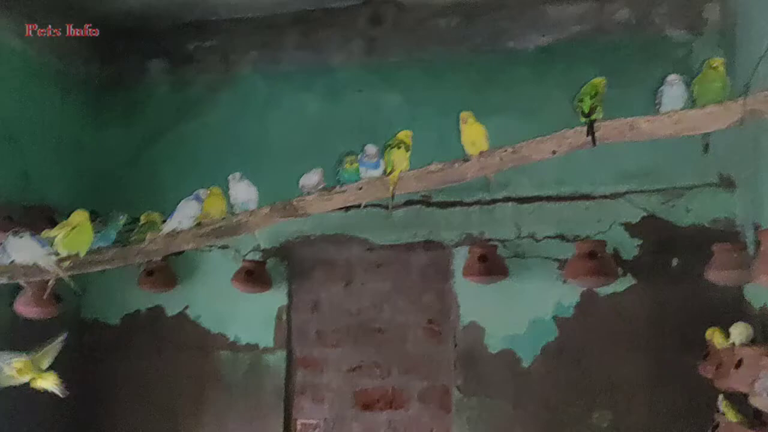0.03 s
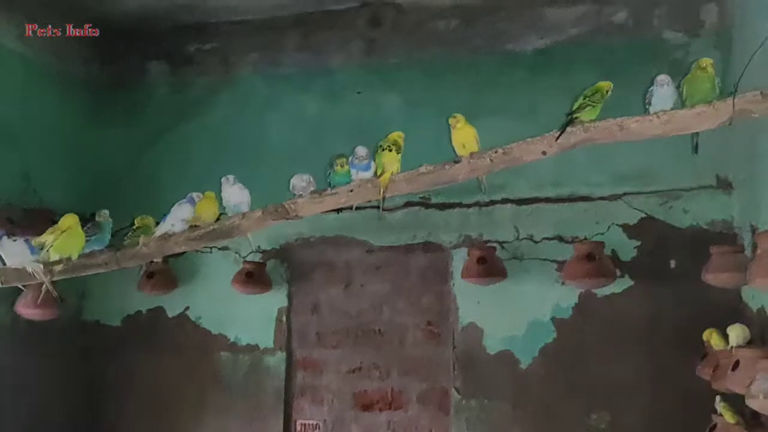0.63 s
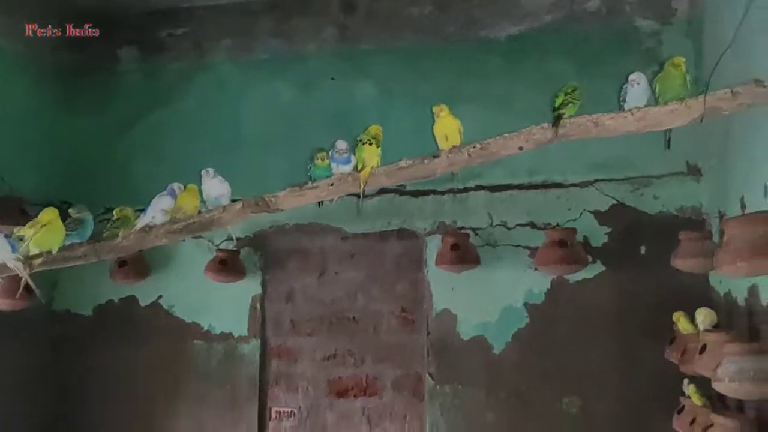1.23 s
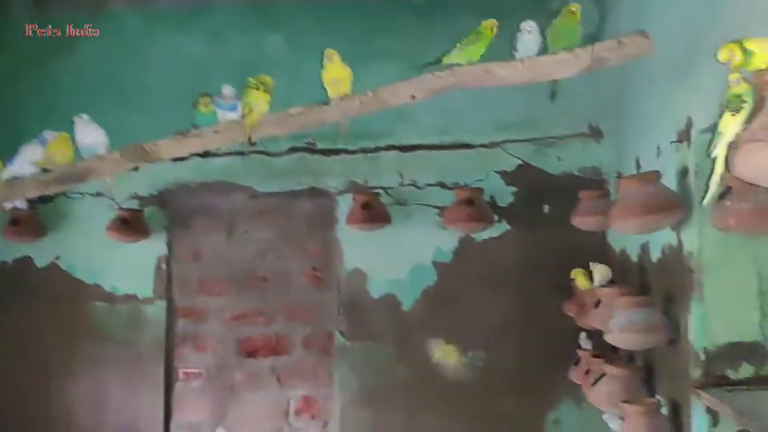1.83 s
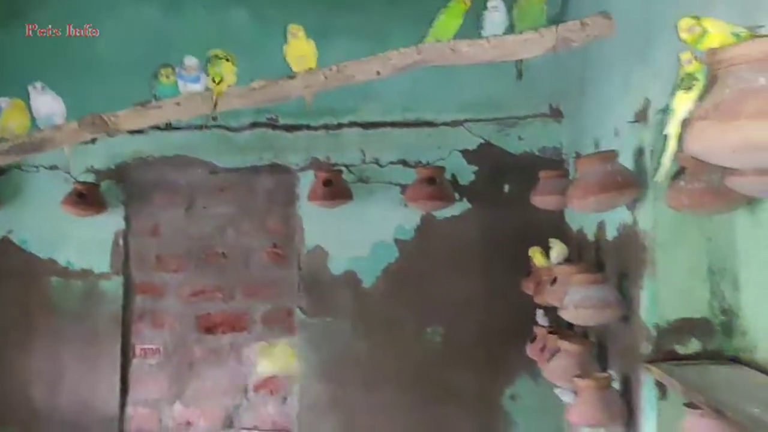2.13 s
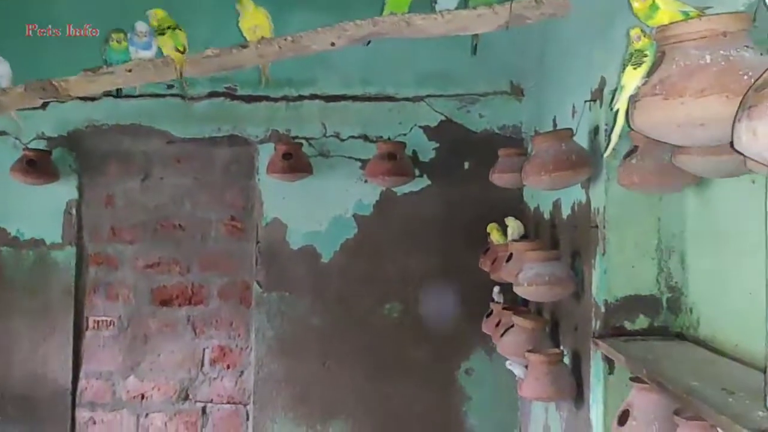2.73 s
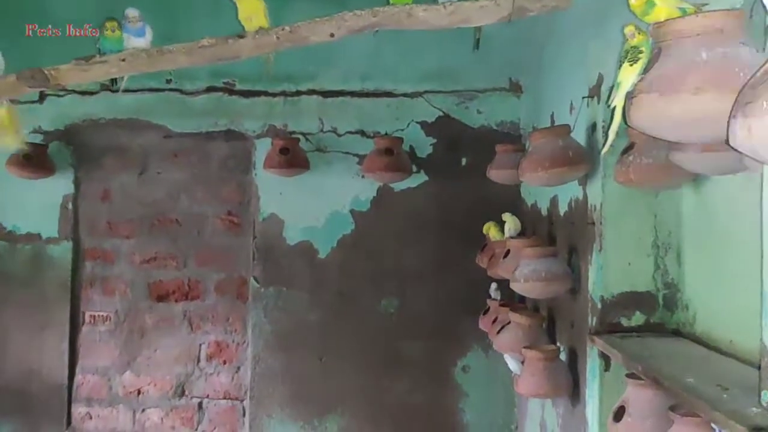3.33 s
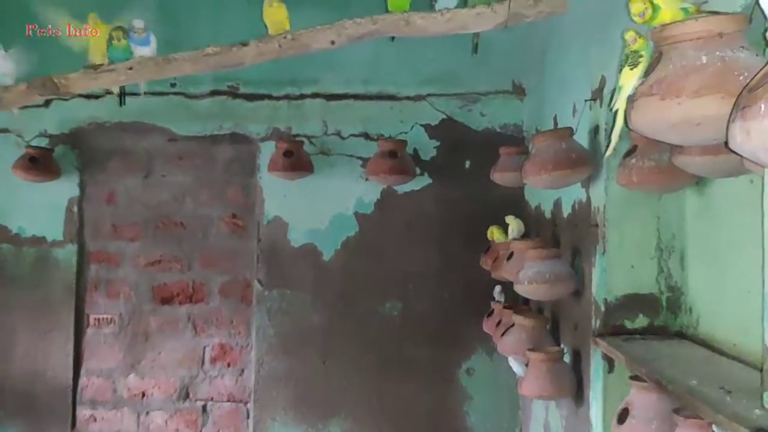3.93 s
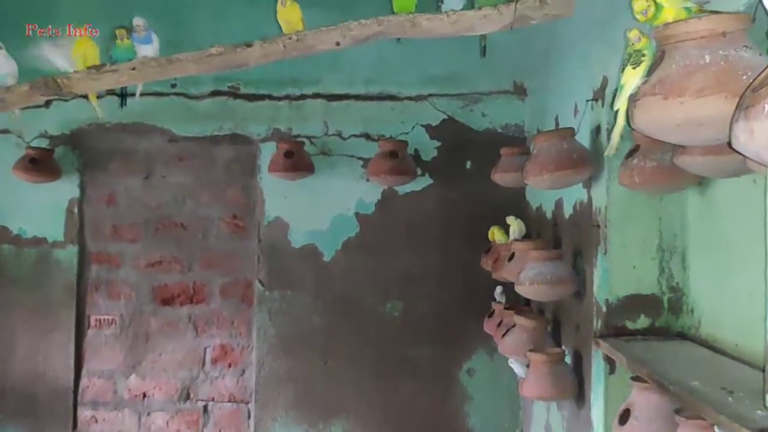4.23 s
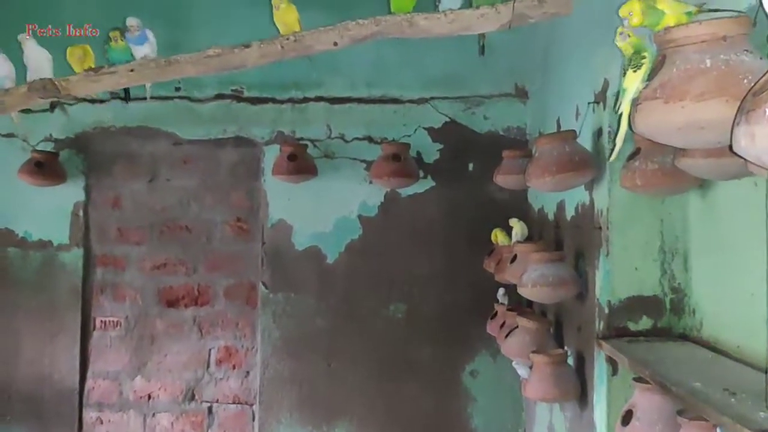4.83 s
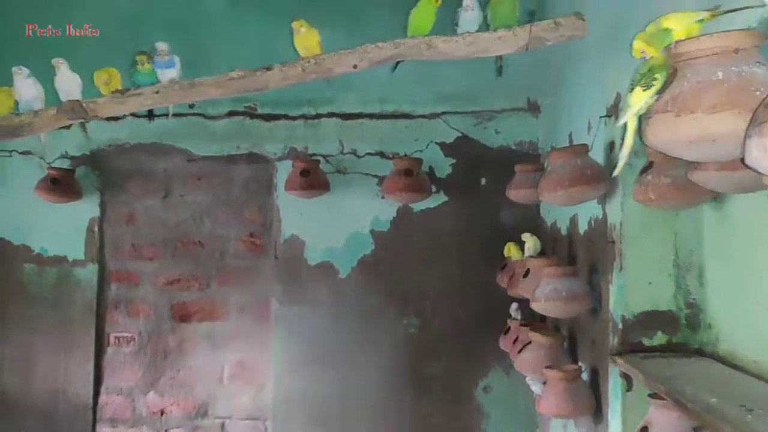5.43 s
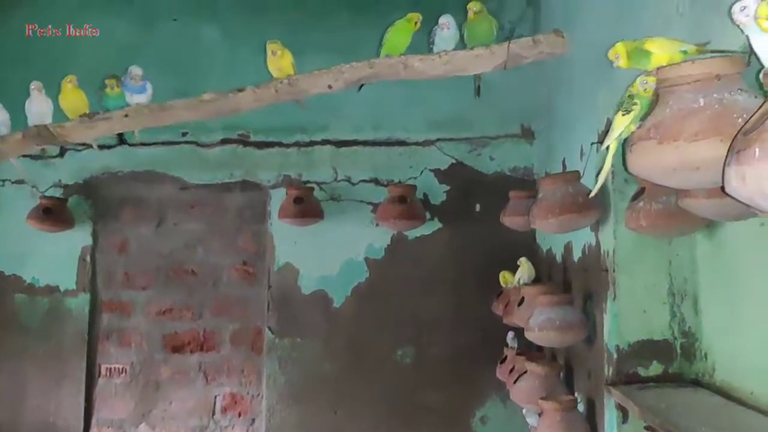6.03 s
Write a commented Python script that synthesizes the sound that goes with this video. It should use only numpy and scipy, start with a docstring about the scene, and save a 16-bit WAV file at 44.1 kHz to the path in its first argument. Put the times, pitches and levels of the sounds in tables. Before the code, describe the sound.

Small parrots call over one another indoors, their bright chirps, thin whistles and scratchy squawks standing out from a more distant twittering. A few soft wingbeats pass in the first half, then the chatter grows raspier and busier. The hard walls give every call a short echo, and the flock sits slightly left of the microphone. A quiet hum, rumble and airy hiss lie underneath.

```python
"""Budgerigars chatter in a bare brick room: warbled chirps, peeps, whistles, quick sweeps, raspy squawks.
Each call is a membrane tone from the syrinx, bent in pitch; in a squawk the membranes slap and ring
the beak. The hard walls draw every call out into a tail. Birds further off keep up a soft babble and
some flutter between perches. Underneath lie a low hum, rumble, moving air and a few faint tones."""
import sys
import numpy as np
from scipy import signal
from scipy.fft import rfft, irfft, next_fast_len
from scipy.io import wavfile
from scipy.ndimage import uniform_filter1d, minimum_filter1d

SR = 44100
rng = np.random.default_rng(int(sys.argv[2]) if len(sys.argv) > 2 else 0)


def to_wav(sig):
    """Store sig (one row per channel, or 1-D mono) as 16-bit WAV at the path in sys.argv[1].

    Samples outside -1..1 are clipped; the rate is SR.
    """
    pcm = np.clip(np.atleast_2d(sig), -1, 1) * 32767
    pcm = np.round(pcm).astype(np.int16)
    wavfile.write(sys.argv[1], SR, pcm.T)  # frames by channels


N = 268039
TIME = np.arange(N) / SR
CALL_T = np.arange(SR * 2 // 9) / SR  # time axis of one call, s
TOP_HZ = 15900


def near_birds():
    """The clear calls, each from its own perch."""
    # Each row: start in s, length in s, pitch in Hz, level in dB.
    chirps = [(0.384, 0.098, 3410, -20), (0.602, 0.052, 2980, -30.5), (0.647, .08, 3622, -18),
              (.698, 0.075, 3270, -29.5), (0.904, 0.086, 2912, -22.5), (1.042, 0.071, 3150, -26),
              (1.303, 0.077, 3370, -33.5), (1.369, 0.075, 3330, -29.5), (1.515, 0.068, 3820, -30.5),
              (1.587, 0.049, 3206, -21), (1.926, 0.13, 3042, -20.5), (2.059, 0.094, 3640, -18),
              (2.496, 0.11, 2883, -25), (2.544, 0.08, 3638, -24), (2.615, 0.073, 2103, -34),
              (2.936, 0.058, 2943, -28), (3.119, .12, 3165, -17.5), (3.377, 0.11, 3212, -22),
              (3.531, 0.1, 3350, -29.5), (3.819, 0.024, 3757, -22), (3.868, 0.1, 3108, -21),
              (4.219, .13, 2995, -25), (4.402, 0.039, 4337, -17.5), (4.804, 0.0656, 3400, -18.5),
              (4.859, 0.102, 3500, -19.5), (5.04, 0.06, 3400, -22.5), (5.326, 0.12, 2880, -33),
              (5.458, 0.087, 3466, -20.5), (5.537, .17, 2700, -33), (5.582, 0.057, 3580, -16.5),
              (5.69, 0.086, 3435, -37), (5.979, 0.096, 3014, -15.5)]
    # Each row: start in s, pitch in Hz, level in dB.
    peeps = [(1.65, 2828, -23.5), (2.49, 3410, -21.5), (3.075, 3565, -29), (3.19, 3530, -21),
             (3.41, 3584, -22), (4.885, 3494, -15), (5.068, 3040, -27), (5.285, 3887, -23),
             (5.874, 3326, -12.5)]
    # Each row: start in s, length in s, pitch in Hz, level before the beak in dB.
    whistles = [(0.385, 0.0063, 3066, -14), (0.827, 0.034, 4620, -25), (0.861, 0.031, 4780, -14.5),
                (.911, 0.026, 3100, -24), (0.979, 0.053, 2802, -19.5), (1.056, 0.022, 2964, -17),
                (1.725, 0.024, 3134, -13), (2.33, 0.041, 3073, -21), (2.389, 0.026, 3315, -20.5),
                (2.474, 0.14, 3050, -19), (2.656, 0.083, 3014, -19.5), (2.825, 0.061, 3096, -24),
                (3.387, 0.17, 2940, -28), (3.568, 0.024, 2970, -15.5), (3.993, 0.14, 2865, -27),
                (4.701, 0.16, 2960, -33), (5.306, 0.058, 3380, -25), (5.557, 0.023, 3787, -13.5),
                (5.562, 0.047, 2937, -13.5), (5.856, 0.043, 3042, -15.5), (5.922, 0.047, 4328, -13.5),
                (5.94, .03, 3333, -10.5)]
    # Each row: frequency in Hz, gain of the open beak in dB.
    beak_response = [(2800, -11), (3300, -18), (3900, 1), (6400, -8.5), (7700, -8.5), (9400, -13)]
    # Each row: start in s, start pitch in Hz, end pitch in Hz, level in dB.
    sweeps = [(0.402, 8600, 7760, -30.5), (0.433, 7300, 9300, -38), (.455, 8400, 7150, -36),
              (.963, 9600, 8800, -17.5), (1.267, 4360, 5520, -29.5), (1.558, 9200, 8540, -35.5),
              (1.604, 7500, 6960, -31), (1.633, 8800, 8240, -32), (1.655, 5500, 6160, -30),
              (4.109, 4580, 6240, -18), (4.11, 6940, 9070, -14), (4.136, 4376, 6280, -14),
              (4.224, 9870, 7950, -18), (4.269, 8800, 5600, -17), (4.313, 5200, 7030, -16.5),
              (4.372, 6200, 7600, -19), (4.715, 8800, 6850, -16.5), (5.915, 7670, 9000, -30)]
    # Each row: start in s, length in s, pitch in Hz, beak resonance in Hz, roughness 0-1, relative dB.
    squawks = [(0.818, 0.12, 2418, 9000, .35, -27.5), (.925, 0.057, 2900, 7000, .7, -20.5),
               (1.264, 0.033, 3420, 6600, 0.5, -36), (1.715, 0.039, 3190, 6040, .6, -29),
               (1.807, 0.05, 2784, 6340, .9, -21), (1.899, 0.054, 2790, 5000, 1, -17.5),
               (2.009, 0.042, 3130, 6300, 0.5, -29), (2.443, 0.14, 2075, 4000, .6, -31),
               (2.631, 0.086, 2152, 4170, .8, -28.5), (3.52, 0.037, 2830, 5500, .6, -33.5),
               (4.103, 0.069, 2600, 5300, .8, -18.5), (4.208, 0.086, 3038, 5400, .9, -22),
               (4.305, 0.062, 2604, 4480, 1, -19.5), (4.432, 0.045, 2250, 4740, .8, -26),
               (4.538, 0.069, 2698, 5600, 1, -28), (4.665, 0.071, 2950, 5870, .9, -23),
               (4.776, 0.024, 3550, 7000, 1, -24.5), (4.874, 0.06, 2600, 5500, 1, -35.5),
               (5.323, 0.06, 3350, 6600, .7, -26), (5.519, 0.044, 2903, 3650, .9, -24),
               (5.592, 0.037, 2980, 4800, .8, -26), (5.853, 0.029, 3160, 12600, .3, -27.5),
               (5.931, 0.025, 3305, 5930, .5, -17.5)]
    out = np.zeros((2, N))
    for start_s, length_s, hz, db in chirps:
        add(out, start_s, amp(db) * room(chirp(length_s, *glide(hz)), direct_db=0))
    for start_s, hz, db in peeps:
        add(out, start_s, amp(db) * room(peep(hz), direct_db=-4.5))
    for start_s, length_s, hz, db in whistles:
        call = whistle(length_s, *glide(hz), along(beak_response, hz), along(beak_response, 2 * hz))
        add(out, start_s, amp(db) * room(call, direct_db=-4.5))
    for start_s, start_hz, end_hz, db in sweeps:
        add(out, start_s, amp(db) * room(sweep(start_hz, end_hz), direct_db=-0.5))
    for start_s, length_s, hz, beak_hz, roughness, db in squawks:
        call = squawk(length_s, beak_hz, hz, lurch=0.09 * roughness)
        add(out, start_s, amp(db) * room(call, direct_db=-1))
    return out


def syrinx(length_s, start_hz, end_hz, bend):
    """Phase of a gliding membrane tone; bend is a fraction of its pitch."""
    pitch_hz = start_hz + (end_hz - start_hz) * np.clip(CALL_T / length_s, 0, 1)
    return 2 * np.pi * np.cumsum(pitch_hz * (1 + bend)) / SR


def glide(hz, rise=0.018, spread=0.0299):
    """Start and end pitch of a call drifting, mostly upward, through hz."""
    half = (rise + spread * rng.standard_normal()) / 2
    return hz * (1 - half), hz * (1 + half)


def chirp(length_s, start_hz, end_hz, crest=0.045, dip=0.16, trill_hz=90):
    """A warble: pitch dwells on a crest and dives unevenly; the level sags in each dive."""
    rate_hz = trill_hz * (1 + 0.4 * wobble(90, CALL_T))
    trill = np.sin(np.pi * np.cumsum(rate_hz) / SR) ** 2
    dive = dip * trill ** 2 * (1 + 0.79 * np.tanh(wobble(200, CALL_T)))
    wander = 0.0368 * np.tanh(wobble(68.87, CALL_T))
    jitter = 0.021 * wobble(2500, CALL_T)
    phase = syrinx(length_s, start_hz, end_hz, crest - dive + wander + jitter)
    tone = np.sin(phase) + amp(-23) * np.sin(2 * phase) + amp(-30) * np.sin(3 * phase)
    flutter_db = 3.9 * wobble(154.6, CALL_T) - 2 * trill
    return unit(tone * amp(flutter_db)) * swell(length_s, edge_s=0.024)


def peep(hz, length_s=0.044):
    """A nearly pure, level note."""
    phase = syrinx(length_s, hz, hz, 0.013 * wobble(328, CALL_T))
    return unit(np.sin(phase)) * swell(length_s, edge_s=0.0028)


def whistle(length_s, start_hz, end_hz, first_db, octave_db, flutter_db=4):
    """A held note that arches and wavers; the beak favours the octave, and each partial flutters."""
    arch = 0.021 * (np.sin(np.pi * np.clip(CALL_T / length_s, 0, 1)) - 2 / np.pi)
    phase = syrinx(length_s, start_hz, end_hz, arch + 0.025 * wobble(896, CALL_T))
    tone = 0
    for k, db in enumerate([first_db, octave_db, octave_db - 10, octave_db - 17], start=1):
        flutter = amp(flutter_db * wobble(395, CALL_T))
        tone += amp(db) * unit(np.sin(k * phase) * flutter)
    return tone * swell(length_s, edge_s=0.0019)


def sweep(start_hz, end_hz, length_s=0.014):
    """A shaky flick of pitch with weaker partials a fifth and an octave up."""
    phase = syrinx(length_s, start_hz, end_hz, 0.056 * wobble(1020, CALL_T))
    tone = np.sin(phase) + amp(-13) * np.sin(1.5 * phase) + amp(-24) * np.sin(2 * phase)
    return unit(tone) * swell(length_s, edge_s=0.0037)


def squawk(length_s, beak_hz, pitch_hz=3100, lurch=0.075, slap_hz=300, chop_db=11, width_hz=1500):
    """Membranes slap unevenly, chopping a lurching tone into puffs that ring the beak."""
    # Each row: frequency in Hz, gain of the rasp in dB.
    rasp_response = [(600, -59), (1500, 4), (2500, -6.5), (5000, -2), (9000, -3), (13000, -7.5),
                     (16000, -19)]
    slap_phase = syrinx(length_s, slap_hz, slap_hz, 0.234 * wobble(202, CALL_T))
    bend = lurch * wobble(190, CALL_T) + 0.0336 * wobble(1500, CALL_T)
    phase = syrinx(length_s, pitch_hz, pitch_hz, bend)
    halves = range(2, int(2 * TOP_HZ / pitch_hz) + 1)  # period doubling adds half overtones
    voice = unit(sum(amp(-2 * (k % 2)) * np.sin(k * phase / 2) for k in halves))
    chop = amp(chop_db * np.cos(slap_phase) + 2.85 * wobble(82, CALL_T))
    hiss = amp(-15) * rng.standard_normal(len(CALL_T))
    resonance = lambda hz: 1 + amp(8) / (1 + (2 * (hz - beak_hz) / width_hz) ** 2)
    rasp = filtered(chop * (voice + hiss), lambda hz: amp(along(rasp_response, hz)) * resonance(hz))
    return amp(4) * unit(rasp) * swell(length_s, edge_s=0.007)


def far_birds(birds=6, calls=18):
    """Distant birds shuffle one stock of raspy chirps and overlap into a babble."""
    # Each row: time in s, relative babble level in dB.
    babble_levels = [(.4, -37.5), (.9, -31), (1.4, -33), (2.0, -28), (2.4, -31.5), (2.9, -35.5),
                     (3.4, -24.5), (4.0, -30), (4.6, -32), (5.2, -27), (6.0, -33)]
    stock = []
    for height, slope in rng.uniform(-1.2, 1, (calls, 2)):
        hz = 3200 * np.exp(0.14 * height)
        warble = chirp(0.08, hz, hz * (1 + 0.12 * slope))
        stock.append(warble + amp(-7) * squawk(0.042, beak_hz=1.236 * hz))
    out = np.zeros((2, N))
    for _ in range(birds):
        song = np.zeros((1, N))
        for slot, pick in enumerate(rng.permutation(calls)):
            start_s = (slot + rng.random()) / calls * N / SR
            add(song, start_s, stock[pick][None])
        add(out, 0, room(song[0], direct_db=-14))
    return unit(out) * amp(curves(babble_levels)[0] + 0.5)


def twitter(calls=16, centre_hz=7200, level_db=-45):
    """Faint high flicks of song, loosely spaced."""
    song = np.zeros((1, N))
    for slot, (late, height, slope) in enumerate(rng.uniform(-0.76, 1, (calls, 3))):
        hz = centre_hz * np.exp(0.086 * height)
        start_s = (slot + (1 + late) / 2) / calls * N / SR
        add(song, start_s, sweep(hz, hz * (1 + 0.084 * slope), length_s=0.0326)[None])
    return amp(level_db) * room(song[0], direct_db=-14)[:, :N]


def wings(edge_s=0.017):
    """Short flights: a swish of feathers that pulses with each wingbeat."""
    # Each row: start in s, length in s, wingbeat rate in Hz, level in dB.
    flights = [(0.376, 0.46, 14, -39), (2.641, 0.5, 13.2, -34), (3.122, 0.493, 16.6, -36.5),
               (4.078, 0.44, 12, -65)]
    # Each row: frequency in Hz, relative noise density in dB.
    feather_spectrum = [(30, 5), (150, 2.5), (400, 6), (900, -4), (2500, -0.5), (7000, 7), (15000, -23)]
    envelope = np.zeros(N)
    for start_s, length_s, beat_hz, db in flights:
        t = TIME - start_s
        flying = np.clip(np.minimum(t, length_s - t) / edge_s, 0, 1)
        beat_db = 2 * np.cos(2 * np.pi * beat_hz * t) + 0.37 * wobble(45, TIME)
        envelope += flying * amp(db + beat_db)
    return envelope * rush(feather_spectrum, side_db=-17)


def hum(low_hz=64.7):
    """A low tone and four upper tones swell and fade; rumble follows the low one."""
    # Each row: time in s, level of the low tone in dB, level of the upper tones in dB.
    hum_levels = [(0.45, -40, -69), (0.7, -48, -61), (1.38, -42, -55), (1.71, -47.5, -55), (2.02, -50, -50),
                  (2.24, -46, -53), (2.37, -60, -60.5), (2.71, -47, -57.5), (3.82, -45.5, -57.5),
                  (4.07, -50.5, -47.5), (5.19, -59, -72.5), (5.35, -65, -65), (5.5, -48.5, -81),
                  (6.05, -61, -58)]
    # Each row: frequency in Hz, relative level in dB.
    upper_tones = [(88, 3.5), (117, -8.5), (132, -7.5), (144, -6.5)]
    # Each row: frequency in Hz, relative noise density in dB.
    rumble_spectrum = [(15, 0.5), (33, 0), (48, -4), (70, -1), (110, -7), (200, -16.5), (500, -46.5)]
    low_db, upper_db = curves(hum_levels)
    low = drone(low_hz)
    upper = sum(amp(db) * drone(hz) for hz, db in upper_tones)
    rumble = amp(-1) * rush(rumble_spectrum, side_db=-17)
    return amp(low_db) * (low + rumble) + amp(upper_db) * upper


def drone(hz, waver_db=3, drift_rad=0.27):
    """One tone of the hum, wavering in level and phase."""
    waver = amp(waver_db * wobble(12, TIME))
    return unit(waver * np.sin(2 * np.pi * hz * TIME + drift_rad * wobble(27, TIME)))


def draught():
    """Moving air: broad noise that slowly rises and falls."""
    # Each row: time in s, level in dB.
    air_levels = [(.4, -39.5), (1.0, -37.5), (2.3, -38.5), (2.7, -38), (3.2, -49), (3.8, -32.5), (4.5, -36),
                  (5.3, -41.5), (5.6, -38.5), (6.0, -38.5)]
    # Each row: frequency in Hz, relative noise density in dB.
    air_spectrum = [(60, -21), (140, -8.5), (320, -3.5), (750, -9), (1500, -2.5), (4000, 5), (15000, -88)]
    return amp(curves(air_levels)[0]) * rush(air_spectrum, side_db=-15)


def faint_tones(sag=0.0413):
    """A few faint low tones, each sagging in pitch."""
    # Each row: start in s, length in s (capped by CALL_T), start pitch in Hz, level in dB.
    tones = [(.42, 0.27, 866, -54.5), (0.678, .12, 1156, -44.5), (1.25, 0.15, 1162, -49),
             (2.359, 0.24, 902, -48), (2.664, .23, 317, -44), (5.45, 0.14, 1252, -47)]
    out = np.zeros((2, N))
    for start_s, length_s, hz, db in tones:
        phase = syrinx(length_s, hz, hz * (1 - sag), 0.02 * wobble(140, CALL_T))
        tone = np.sin(phase) * swell(length_s, edge_s=0.011)
        add(out, start_s, amp(db) * room(tone, direct_db=1))
    return out


def room(x, direct_db, wall_t60_s=0.64, treble_t60_s=0.38):
    """Direct sound, mostly on the left, plus the tail of the walls, whose treble dies first."""
    t = np.arange(SR // 2) / SR
    hz = np.fft.rfftfreq(len(t), 1 / SR)
    noise = rng.standard_normal((2, len(t)), dtype=np.float32)
    treble = irfft(rfft(noise) * np.clip((hz - 6000) / 6000, 0, 1), len(t))
    impulse = (noise - treble) * amp(-60 * t / wall_t60_s) + treble * amp(-60 * t / treble_t60_s)
    impulse *= 1 - np.exp(-t / 0.0008)
    impulse *= amp([[1.9], [-2.5]]) / np.linalg.norm(impulse[0])
    impulse[0, 12] += amp(direct_db + 3)
    impulse[1, rng.integers(0, 24)] += amp(direct_db - 5)  # the lag places the source
    return signal.fftconvolve(x[None], impulse, axes=1) / np.hypot(1, amp(direct_db))


def amp(db):
    """Decibels to gain."""
    return 10 ** (np.asarray(db) / 20)


def unit(x):
    """Scale to rms 1."""
    return x / np.sqrt(np.mean(x ** 2) + 1e-20)


def along(points, hz):
    """Interpolate (Hz, value) points on a log axis."""
    knots_hz, values = np.transpose(points)
    return np.interp(np.log(hz + 1), np.log(knots_hz + 1), values)


def curves(rows):
    """One value per sample for each column after the time."""
    times_s, *columns = np.transpose(rows)
    return [np.interp(TIME, times_s, column) for column in columns]


def wobble(rate_hz, t):
    """Smooth random curve with rate_hz knots a second."""
    knots = rng.standard_normal(1024)
    position = t * rate_hz
    k = position.astype(int)
    u = position - k
    ease = u * u * (3 - 2 * u)
    return knots.take(k, mode="wrap") * (1 - ease) + knots.take(k + 1, mode="wrap") * ease


def swell(length_s, edge_s):
    """Call envelope: opens over edge_s, closes over edge_s after length_s."""
    ramp = np.clip(np.minimum(CALL_T, length_s + edge_s - CALL_T) / edge_s, 0, 1)
    return np.sin(np.pi / 2 * ramp) ** 2


def filtered(x, response):
    """Apply the gain response(hz) to x."""
    n = x.shape[-1]
    padded = next_fast_len(n + 4096)
    return irfft(rfft(x, padded) * response(np.fft.rfftfreq(padded, 1 / SR)), padded)[..., :n]


def rush(spectrum, side_db):
    """Stereo noise of rms 1, nearly mono in the bass."""
    mid, side = filtered(rng.standard_normal((2, N)), lambda hz: amp(along(spectrum, hz)))
    side = filtered(side, lambda hz: amp(along([(250, side_db), (1000, 0)], hz)))
    return unit(np.array([mid + side, mid - side]))


def add(out, start_s, x):
    """Mix x into out from start_s."""
    i = int(np.clip(round(start_s * SR), 0, N - 1))
    out[:, i:i + x.shape[1]] += x[:, :N - i]


def scene():
    """The flock over the background, all leaning left."""
    flock = near_birds() + far_birds() + twitter() + wings() * amp([[1.5], [-1.5]])
    background = hum() + draught() + faint_tones()
    return flock + background * amp([[1], [-1]])


def record(dry, silence_s=0.392, ceiling=0.74):
    """Silence at first; a limiter ducks the highest peaks, and the band above TOP_HZ is cut."""
    x = dry * (TIME >= silence_s)
    needed_gain = np.minimum(1, ceiling / (np.abs(x).max(axis=0) + 1e-9))
    gain = uniform_filter1d(minimum_filter1d(needed_gain, size=161), size=161)
    return filtered(x * gain, lambda hz: hz < TOP_HZ)


dry = scene()
out = record(dry)
to_wav(out)
```